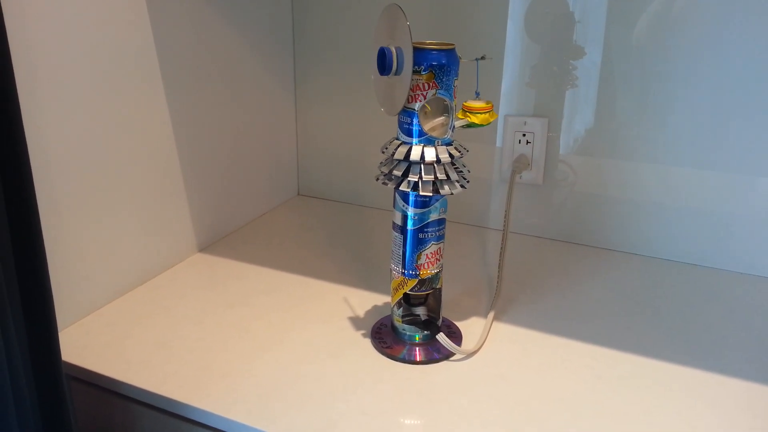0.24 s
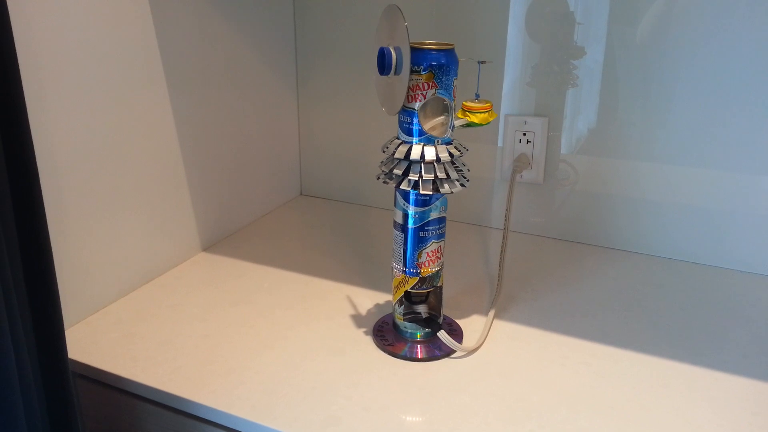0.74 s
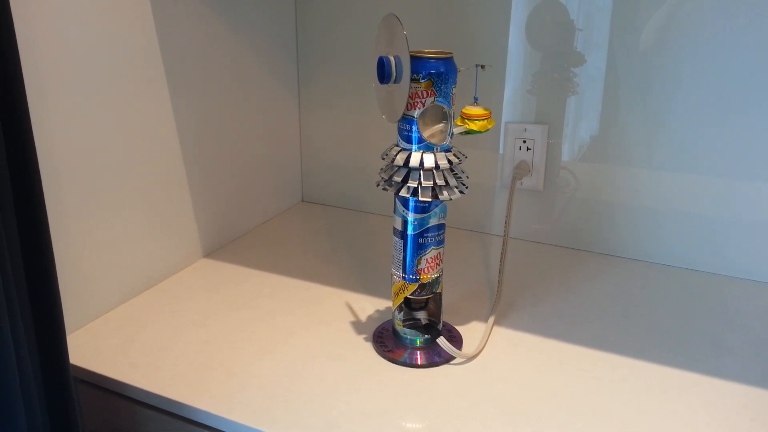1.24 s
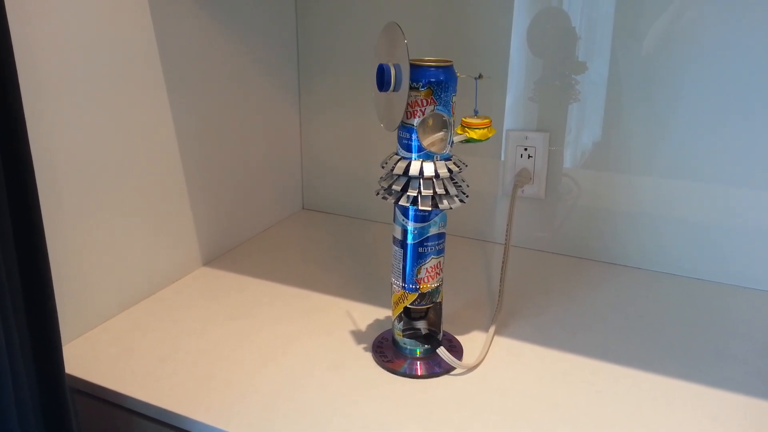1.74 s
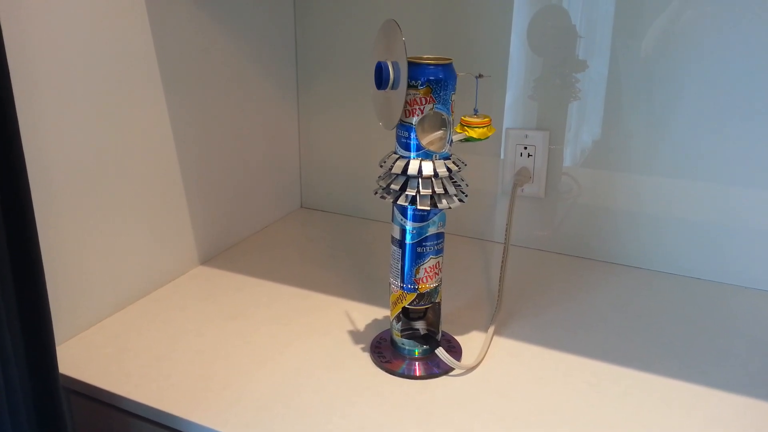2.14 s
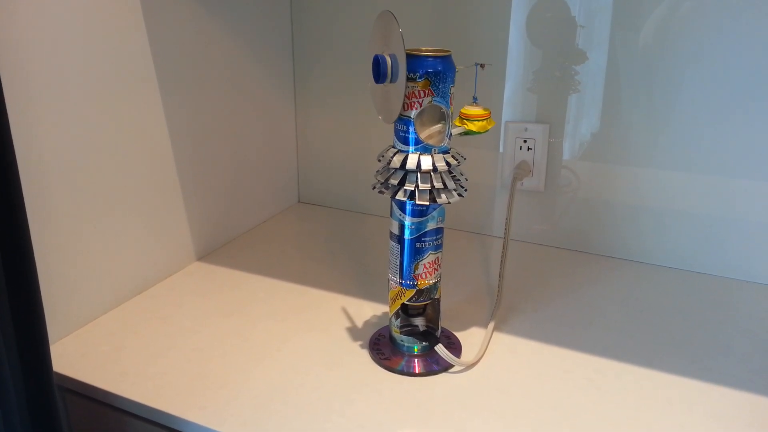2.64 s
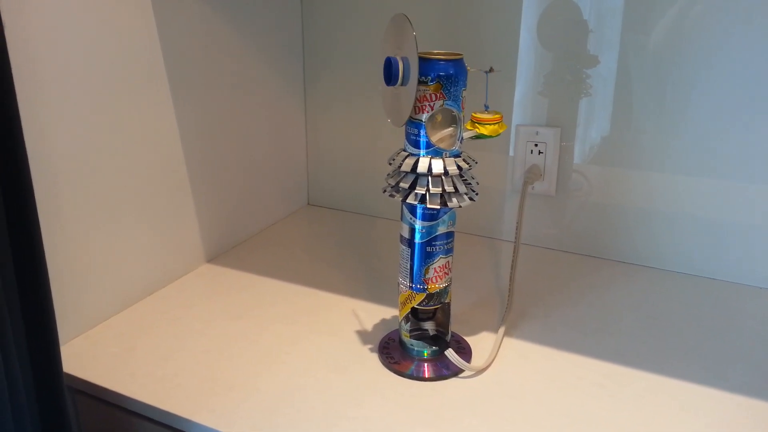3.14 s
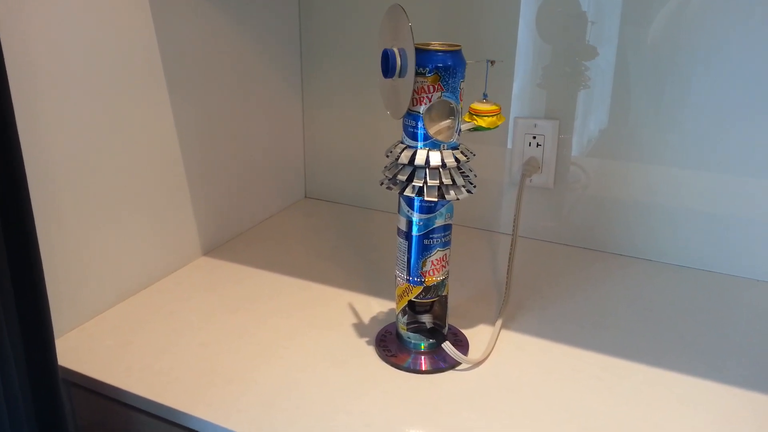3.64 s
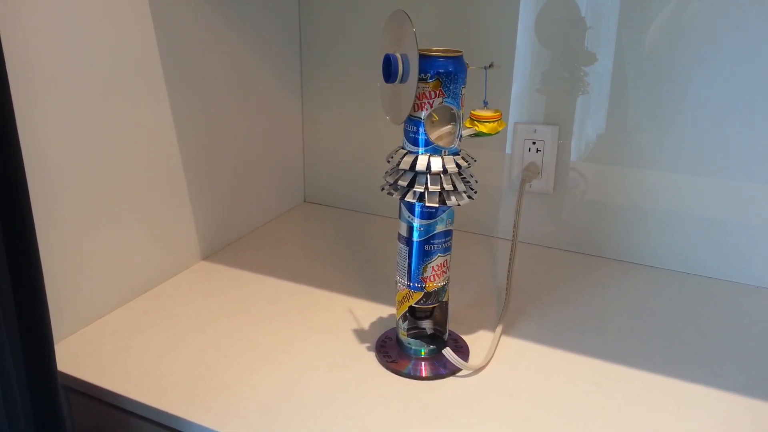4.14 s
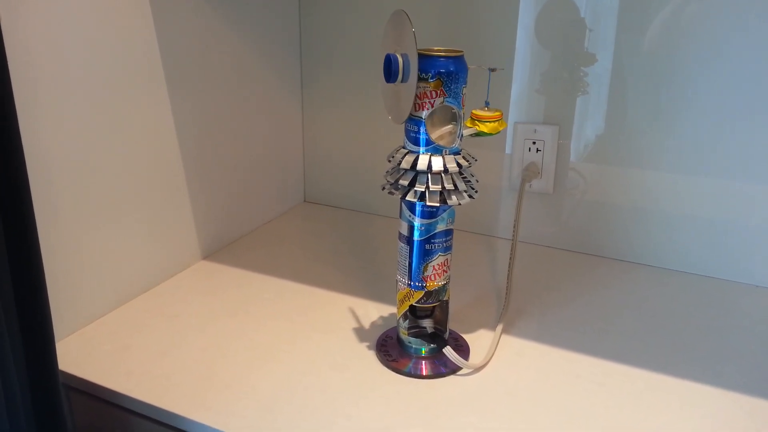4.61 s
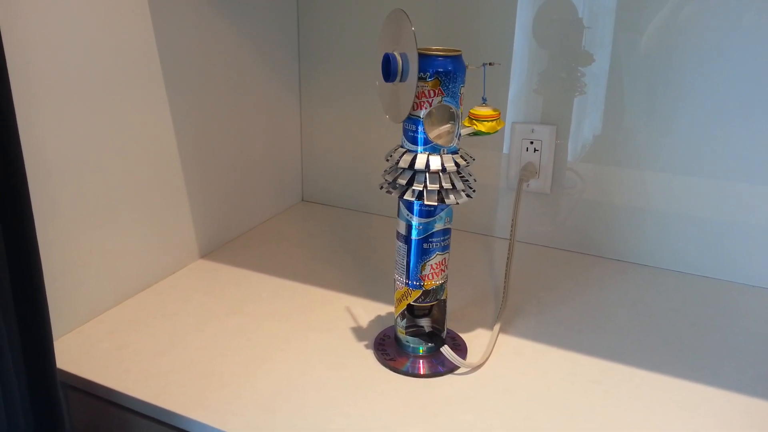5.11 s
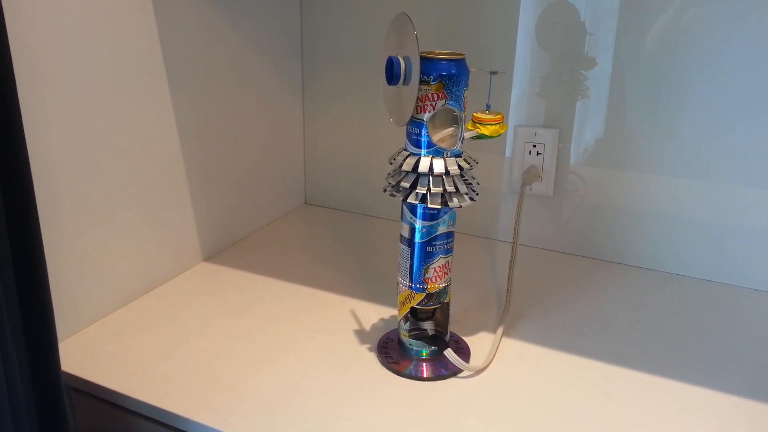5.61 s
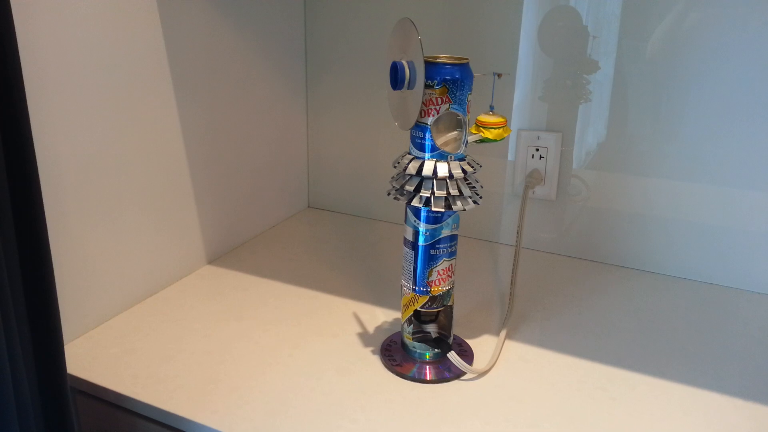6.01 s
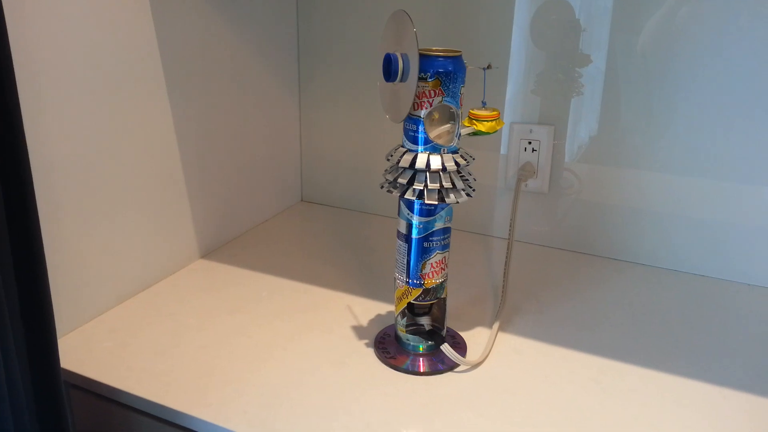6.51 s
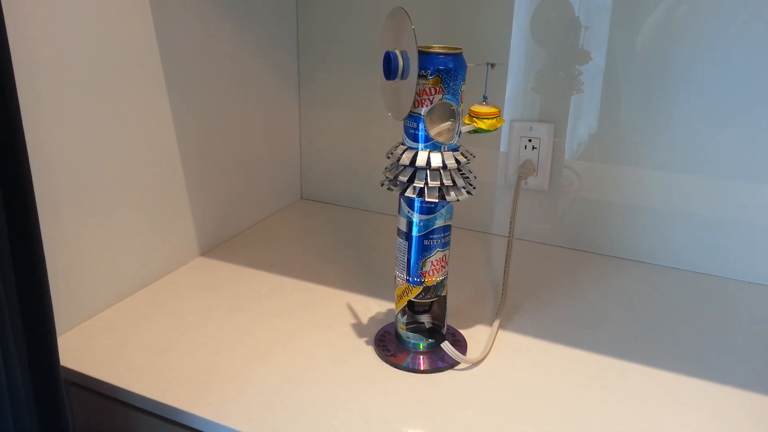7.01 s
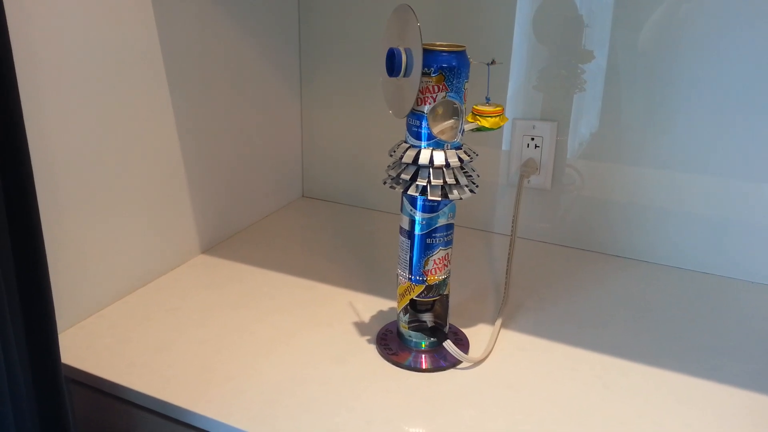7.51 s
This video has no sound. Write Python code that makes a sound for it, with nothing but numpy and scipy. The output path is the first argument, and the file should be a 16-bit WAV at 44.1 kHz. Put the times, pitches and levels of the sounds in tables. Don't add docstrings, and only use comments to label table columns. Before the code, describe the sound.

A small metal engine ticks steadily, sharp tick then softer tock and dull knock, nearly three turns a second, over a low appliance rumble.

```python
import sys
import numpy as np
from scipy import signal
from scipy.fft import rfft, irfft
from scipy.io import wavfile

SR = 44100
rng = np.random.default_rng(int(sys.argv[2]) if len(sys.argv) > 2 else 0)


def ratio_of_db(decibels):
    return 10 ** (np.asarray(decibels, float) / 20)


def store_wav(level_fs):
    pcm = np.round(np.clip(np.atleast_2d(level_fs), -1, 1) * 32767)
    wavfile.write(sys.argv[1], SR, pcm.T.astype(np.int16))


N = 342216

SIDES = np.array([[1], [-1]])
STIFF_RING_S, SOFT_RING_S = 0.085, 0.045
TICK_UNEVEN_DB, KNOCK_UNEVEN_DB, TAP_UNEVEN_DB = 1.5, 2.2, 2.5


def at_hz(points, hz):
    table_hz, values = np.transpose(points)
    return np.interp(np.log(hz + 1), np.log(table_hz + 1), values)


def stereo_noise(shape_db):
    # f/Hz, likeness (1 = the same)
    likeness = [(25, 0.57), (60, 0.93), (130, 0.96), (290, 0.92), (640, 0.55), (1410, -0.15),
                (3100, 0.0077), (6820, -0.072), (15000, 0.055)]
    # f/Hz, level/dB
    lean = [(60, -2), (110, -2.5), (200, 0.0), (380, 0), (700, 1.5), (1290, 0.0), (2380, -1.5), (4400, -1),
            (8120, 5), (15000, -4)]
    hz = np.arange(len(shape_db)) * SR / N
    alike = np.clip(at_hz(likeness, hz), -1, 1)
    mid, side = rfft(rng.standard_normal((2, N)))
    pair = np.sqrt(1 + alike) * mid + SIDES * np.sqrt(1 - alike) * side
    out = irfft(pair * ratio_of_db(shape_db + SIDES * at_hz(lean, hz) / 2), N)
    return out / np.sqrt(np.mean(out ** 2))


def room_tone():
    # f/Hz, level/dB per Hz
    floor = [(15, -50), (30, -29), (60, -12.5), (103, -10.5), (148, -5), (245, -2), (614, -14), (881, -13),
             (1380, -21.5), (2030, -21), (3080, -30.5), (4680, -34.5), (8400, -43.5), (15000, -41.5)]
    # f/Hz, width/Hz, level/dB
    room_modes = [(56.6, 15, 7.5), (73, 11.3, 5.5), (156, 20, 8), (175, 7.4, -4), (198.5, 8.2, 9.5),
                  (287.3, 22, 4), (351.7, 19, 6.5), (409, 11, 3.5)]
    # f/Hz, level/dB
    hum_lines = [(240, -52.5)]
    # t/s, level/dB
    surges = [(.45, 5), (1.2, 4), (1.75, 2), (2.92, 4), (3.44, 2), (4.02, 8), (5.4, 1), (6.5, 2.5),
              (7.56, 4)]
    floor_db, rest_db, surge_s = -43.5, -1.5, 0.1
    hz, t = np.arange(N // 2 + 1) * SR / N, np.arange(N) / SR
    boost_db = sum(level_db / (1 + (2 * (hz - centre) / width) ** 2) for centre, width, level_db in room_modes)
    tone = ratio_of_db(floor_db) * stereo_noise(at_hz(floor, hz) + boost_db)
    rumble = irfft(rfft(tone) * (hz > 130) * (hz < 230), N)
    swell_db = rest_db + sum(level_db * np.exp(-((t - s) / surge_s) ** 2) for s, level_db in surges)
    hum = sum(ratio_of_db(level_db + 2.5) * np.sin(2 * np.pi * line_hz * t) for line_hz, level_db in hum_lines)
    return tone + rumble * (ratio_of_db(swell_db) - 1) + hum


def strokes(turn, rows):
    power = 0
    for angle, peak_db, rise_db, fall_db in rows:
        since = (turn - angle) % 1
        drop_db = np.minimum(fall_db * since, rise_db * (1 - since))
        power = power + ratio_of_db(peak_db - drop_db) ** 2
    return np.sqrt(power)


def rubbing(turn):
    # crank angle/turn, peak level/dB, rise/dB per turn, fall/dB per turn
    scuffs = [
        (.03, -46, 236, 82),
        (.46, -53, 119, 149),
        (0.623, -48.5, 290, 139),
        (.95, -52.5, 110, 64),
    ]
    # crank angle/turn, peak level/dB, rise/dB per turn, fall/dB per turn
    puffs = [
        (.001, -54, 330, 144),
        (.65, -67, 65, 75),
        (.92, -68.5, 60, 40),
    ]
    # f/Hz, level/dB per Hz
    scuff_colour = [(700, 3.5), (1200, 2), (2200, -1), (3500, -6.5), (6000, -7.5), (7500, -23.5),
                    (10000, -18)]
    # f/Hz, level/dB per Hz
    hiss_colour = [(3000, -20), (6000, 3.5), (9000, 2), (12000, -1.5), (14500, -12), (15500, -20)]
    hz = np.arange(N // 2 + 1) * SR / N
    scuff = strokes(turn, scuffs) * stereo_noise(at_hz(scuff_colour, hz))
    hiss = strokes(turn, puffs) * stereo_noise(at_hz(hiss_colour, hz))
    return scuff + hiss


def strike(modes, longest_s, spread, rise_s):
    t = np.arange(SR // 8) / SR
    hz, level_db, t60, pan_db = np.transpose(modes)[:, :, None, None]
    rise_s = np.reshape(rise_s, (-1, 1, 1))
    t60 = np.minimum(t60, longest_s * (2000 / hz) ** 1.5)
    slip = spread * hz / 4000 * rng.standard_normal(hz.shape)
    start = np.pi * rng.uniform(-1, 1, hz.shape) * np.minimum(rise_s * 700, 1) ** 2
    swing = np.sin(2 * np.pi * hz * t + start + SIDES * slip)
    fade = ratio_of_db(level_db + SIDES * pan_db / 2 - 60 * t / t60)
    return -fade * (1 - np.exp(-t / rise_s)) * swing


def blows(times, peaks_db, modes, uneven_db):
    out = np.zeros((2, N + SR))
    share = ratio_of_db(uneven_db * rng.standard_normal((len(times), len(modes))))
    for s, peak_db, weights in zip(times, peaks_db, share):
        at = round(s * SR)
        out[:, at:at + modes.shape[2]] += ratio_of_db(peak_db) * np.tensordot(weights, modes, 1)
    return out[:, :N]


def cracks(times, peaks_db, t60, edges_hz):
    gain, t = np.zeros(N + SR), np.arange(SR // 8) / SR
    for s, peak_db in zip(times, peaks_db):
        at = round(s * SR)
        gain[at:at + len(t)] += ratio_of_db(peak_db - 60 * t / t60) * (1 - np.exp(-t / 0.0019))
    band = signal.butter(4, edges_hz, "band", fs=SR, output="sos")
    mid, side = rng.standard_normal((2, N))
    return signal.sosfilt(band, gain[:N] * (mid + 0.88 * side * SIDES))


def scrapes(times, peaks_db):
    return cracks(times, peaks_db - 10.5, t60=0.03, edges_hz=(1340, 6970))


def ticks(times, peaks_db):
    # f/Hz, level/dB, t60/s, left over right/dB
    crank = [(917, -8, 0.039, -0.5), (1575, -7.5, 0.017, -4), (2025, -8, 0.025, -11),
             (2245, -11.5, 0.014, -23), (2220, -2.5, 0.02, 4), (2328, -2, 0.045, 2), (1102, -8, 0.031, -4),
             (2754, -18, 0.026, 9), (2800, -15, 0.01, -32.5), (3045, -22, 0.048, 11.5),
             (3364, -14, 0.019, -16), (3230, -19, 0.063, -13), (4200, -22, 0.012, -23),
             (4600, -17, 0.016, -26), (4806, -17.5, 0.023, 22.5), (5500, -24.5, 0.013, -9),
             (6270, -13, .02, 0), (6566, -16.5, 0.06, 21), (7070, -9.5, 0.028, 10), (7493, -8, 0.042, 15.5),
             (7880, -12, 0.048, -8), (8290, -31, 0.04, 19), (8840, -17, 0.034, 10), (9630, -18.5, 0.03, 22),
             (9300, -12.5, 0.03, 10)]
    # f/Hz, build-up time/s
    crank_rise = [(900, 0.004), (1540, 0.00064), (1960, 0.0012), (2450, 0.000093), (3600, 0.00047),
                  (4700, 0.002), (7000, 0.0013), (10000, 0.0011)]
    rise_s = at_hz(crank_rise, np.array(crank)[:, 0])
    ring = strike(crank, STIFF_RING_S, spread=1.0, rise_s=rise_s)
    snap = cracks(times, peaks_db - 18.5, t60=0.034, edges_hz=(900, 10000))
    shiver = cracks(times, peaks_db - 22.5, t60=0.16, edges_hz=(1810, 2520))
    return blows(times, peaks_db - 2.5, ring, TICK_UNEVEN_DB) + snap + shiver


def tocks(times, peaks_db):
    # f/Hz, level/dB, t60/s, left over right/dB
    displacer = [(870, -4, 0.04, -4), (980, 1.5, 0.017, 5), (1204, -3.5, 0.029, -4), (1610, -7.5, 0.044, 7),
                 (2000, -1, 0.033, -11), (2216, -3.5, 0.017, 14.5), (2770, -16, 0.027, -9),
                 (3200, -12, 0.023, -13), (3930, -14, 0.022, -4), (4550, -8.5, 0.027, -6),
                 (5570, -28, 0.017, 10), (6400, -15, 0.04, 31)]
    ring = strike(displacer, SOFT_RING_S, spread=0.69, rise_s=0.0013)
    late_s = 0.0005 * rng.standard_normal(len(times))
    return blows(times + late_s, peaks_db - 3.5, ring, KNOCK_UNEVEN_DB) + scrapes(times, peaks_db - 2.0)


def taps(tap_s, end_s):
    # f/Hz, level/dB, t60/s, left over right/dB
    can_wall = [(819, -6, 0.028, -9), (904, -2, 0.049, -2), (1000, -14, 0.07, -1), (1168, 0.5, 0.021, -3),
                (1500, -12, 0.017, -2), (1860, -11, 0.023, 0), (2690, -19, 0.018, 2), (4200, -11, .01, -2),
                (5900, -17, .01, 3)]
    # t/s from the next tick, level/dB
    take_up = [
        (-.035, -53),
        (-.028, -41.5),
        (-.017, -51.5),
        (-.007, -44),
    ]
    ring = strike(can_wall, SOFT_RING_S, spread=0.36, rise_s=0.00104)
    out = blows(tap_s, -49 + 2 * rng.standard_normal(len(tap_s)), ring, TAP_UNEVEN_DB)
    for before_s, level_db in take_up:
        peaks_db = level_db + rng.standard_normal(len(end_s))
        out += blows(end_s + before_s, peaks_db, ring, TAP_UNEVEN_DB)
    return out


def knocks(times, edge_db):
    # f/Hz, level/dB, t60/s, left over right/dB
    diaphragm = [(660, -5.5, 0.048, 8), (896, -3, 0.11, -5), (1113, 0, 0.031, 3), (1610, -3.5, 0.02, -16),
                 (1960, -13, 0.046, -3), (2600, -31, 0.014, -5), (2864, -11.5, 0.026, -11),
                 (3140, -22.5, 0.036, 16), (3620, -18, 0.048, -31), (4170, -6, 0.04, -6),
                 (4370, -15.5, 0.062, -29), (4620, -11.5, 0.029, 16), (5080, -12, 0.061, -15),
                 (5630, -9, 0.047, 24), (6170, -9, 0.063, 5), (6400, -29.5, 0.053, 10)]
    # t/s after the knock, level/dB
    bounces = [
        (-.004, -10),
        (0, -2),
        (.004, -1),
        (.011, -8),
    ]
    ring = strike(diaphragm, SOFT_RING_S, spread=0.24, rise_s=0.0014)
    dull, bright = ring[:5], ring[5:]
    body_db = -39 + 0.3 * rng.standard_normal(len(times))
    out, scrape_s, scrape_db = np.zeros((2, N)), [], []
    for after_s, level_db in bounces:
        at = times + after_s
        out += blows(at, body_db + level_db, dull, KNOCK_UNEVEN_DB)
        out += blows(at, edge_db + level_db - 1.0, bright, KNOCK_UNEVEN_DB)
        scrape_s = np.append(scrape_s, at)
        scrape_db = np.append(scrape_db, edge_db + level_db)
    return out + scrapes(scrape_s, scrape_db)


def engine():
    # tick t/s, tick peak level/dB, tock level/dB, knock's bright edge level/dB
    turns = [(0.0024, -24, -37.5, -44), (0.3742, -24, -37.5, -38.5), (0.743, -24.5, -40, -38),
             (1.1076, -24, -47, -39.5), (1.4679, -24.5, -40.5, -39.5), (1.8255, -23.5, -38.5, -40.5),
             (2.1802, -22.5, -38.5, -39), (2.5324, -23.5, -37, -35.5), (2.8818, -22, -36, -34.5),
             (3.2292, -22.5, -37.5, -37), (3.574, -23, -37.5, -41), (3.917, -22.5, -36.5, -35.5),
             (4.2582, -22, -36.5, -37), (4.597, -22.5, -43.5, -32.5), (4.9346, -23.5, -36, -34),
             (5.2701, -24, -39.5, -36.5), (5.6054, -24, -45, -32), (5.9401, -23.5, -45, -36),
             (6.274, -24, -42, -36), (6.6061, -23.5, -43, -39), (6.9387, -23.5, -35.5, -39),
             (7.2698, -23.5, -38, -36.5), (7.6009, -24, -38.5, -38)]
    tick_s, tick_db, tock_db, edge_db = np.transpose(turns)
    period = np.diff(tick_s, append=2 * tick_s[-1] - tick_s[-2])
    end_s = tick_s + period
    contacts = ticks(tick_s, tick_db)
    contacts += tocks(tick_s + 0.426 * period, tock_db)
    contacts += taps(tick_s + 0.535 * period, end_s)
    contacts += knocks(tick_s + 0.613 * period, edge_db)
    turn = np.interp(np.arange(N) / SR, np.append(tick_s, end_s[-1]), np.arange(len(tick_s) + 1))
    return contacts, rubbing(turn)


def strays():
    # t/s, peak level/dB, centre f/Hz, width/Hz, t60/s
    clicks = [(0.9312, -36, 5500, 6000, 0.032), (0.9328, -35, 5300, 2500, .041),
              (.9382, -37, 2300, 1300, 0.045), (.9452, -39, 4600, 7000, .14),
              (.9582, -39, 6100, 3600, 0.09), (2.2794, -33, 4800, 2200, 0.013),
              (2.2796, -32, 3160, 700, 0.023), (2.2798, -33, 2150, 700, 0.023),
              (2.2832, -46, 10400, 8000, 0.11), (2.5241, -26, 3600, 4000, 0.005),
              (3.4101, -50, 10900, 7000, .14), (3.4184, -32, 3750, 2600, 0.009),
              (4.4394, -45, 3250, 1500, .021)]
    out, t = np.zeros((2, N)), np.arange(SR // 8) / SR
    for s, peak_db, hz, width, t60 in clicks:
        edges_hz = [max(hz - width / 2, 200), hz + width / 2]
        band = signal.butter(3, edges_hz, "band", fs=SR, output="sos")
        mid, side = rng.standard_normal((2, len(t)))
        burst = signal.sosfilt(band, (mid + 0.74 * side * SIDES) * ratio_of_db(-60 * t / t60))
        at = round(s * SR)
        out[:, at:at + len(t)] += ratio_of_db(peak_db) * burst / np.abs(burst).max()
    return out


def alcove(x):
    # left delay t/s, right delay t/s, level/dB
    echoes = [(.0021, .0024, -12), (.0036, .0039, -8), (.0062, .0058, -12), (.012, .0116, -16),
              (.0195, .0200, -19)]
    # delay t/s, level/dB
    far_echoes = [(.0425, -20), (.0495, -21)]
    # level/dB, t60/s
    tail_parts = [
        (-26.5, 0.13),
        (-33.5, 0.57),
    ]
    t = np.arange(SR // 2) / SR
    fade = sum(ratio_of_db(level_db - 60 * t / t60) for level_db, t60 in tail_parts)
    tail = rng.standard_normal((2, len(t))) * fade * np.minimum(t / 0.0008, 1) / 4
    response = signal.lfilter(*signal.butter(1, 15000, fs=SR), tail)
    far = np.zeros(len(t))
    for s, level_db in far_echoes:
        far[round(s * SR)] = ratio_of_db(level_db)
    response += signal.sosfilt(signal.butter(4, 2900, fs=SR, output="sos"), far)
    response[:, 0] = 1
    for left_s, right_s, level_db in echoes:
        response[[0, 1], [round(left_s * SR), round(right_s * SR)]] += ratio_of_db(level_db)
    return signal.oaconvolve(x, response, axes=1)[:, :N]


def scene():
    contacts, rub = engine()
    return alcove(contacts + strays()) + rub + room_tone()


def band_limit(x):
    return signal.sosfilt(signal.butter(12, 15780, fs=SR, output="sos"), x)


def record(dry):
    top_cut = signal.cheby2(16, 70, 15170, fs=SR, output="sos")
    mix = signal.sosfilt(top_cut, dry)
    return band_limit(mix)


dry = scene()
out = record(dry)
store_wav(out)
```